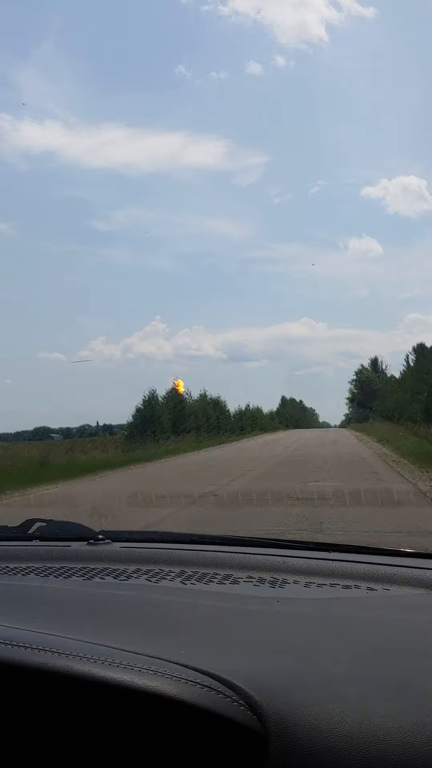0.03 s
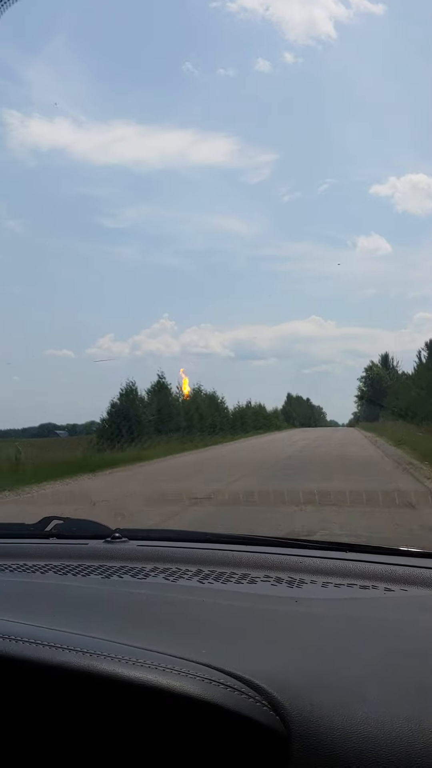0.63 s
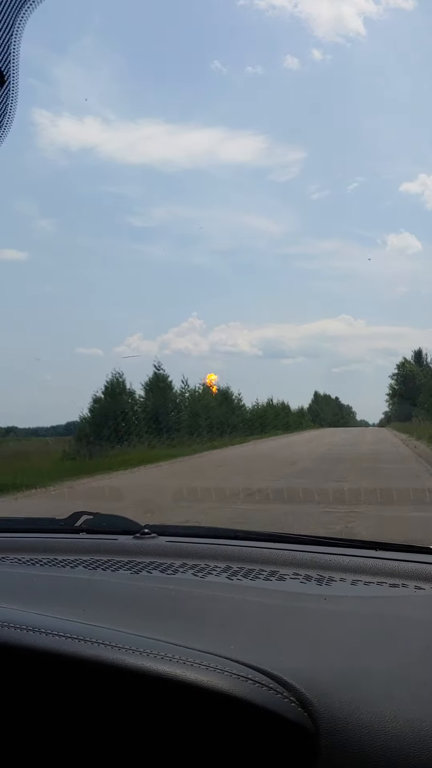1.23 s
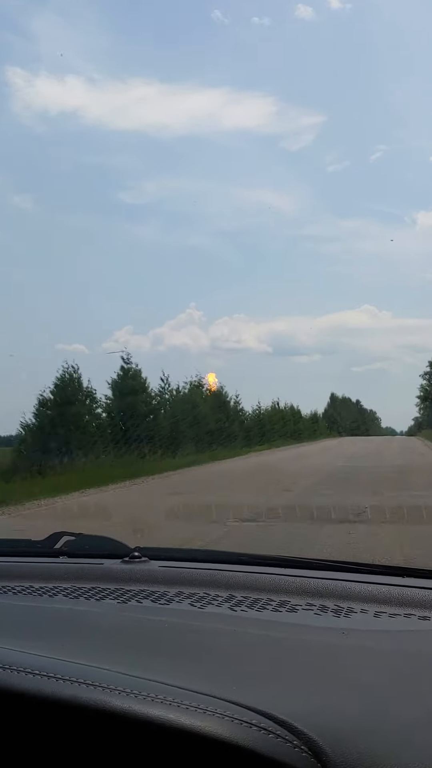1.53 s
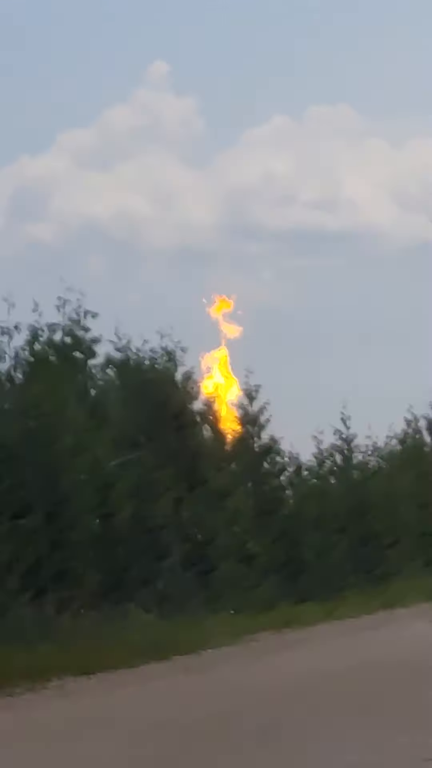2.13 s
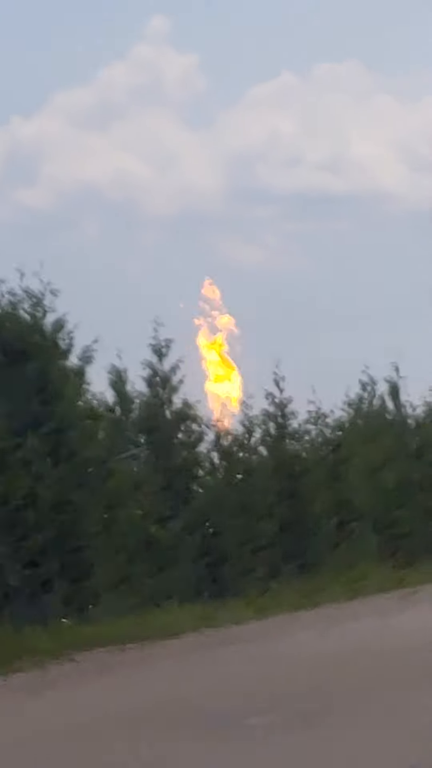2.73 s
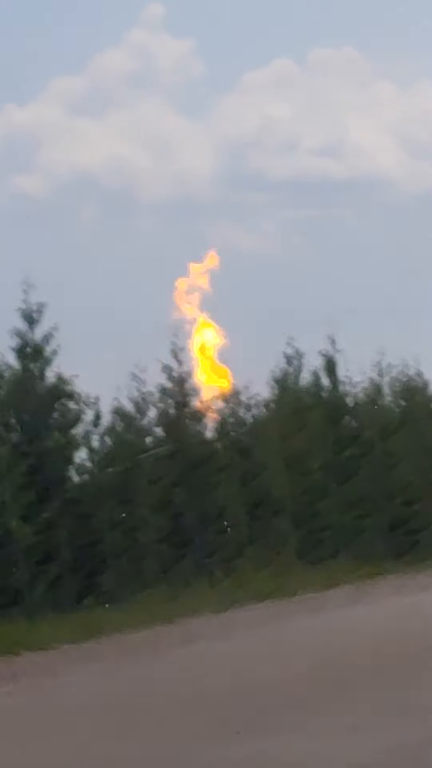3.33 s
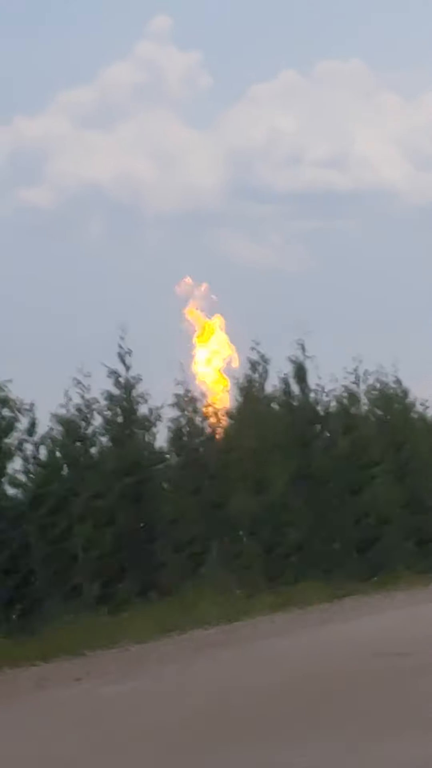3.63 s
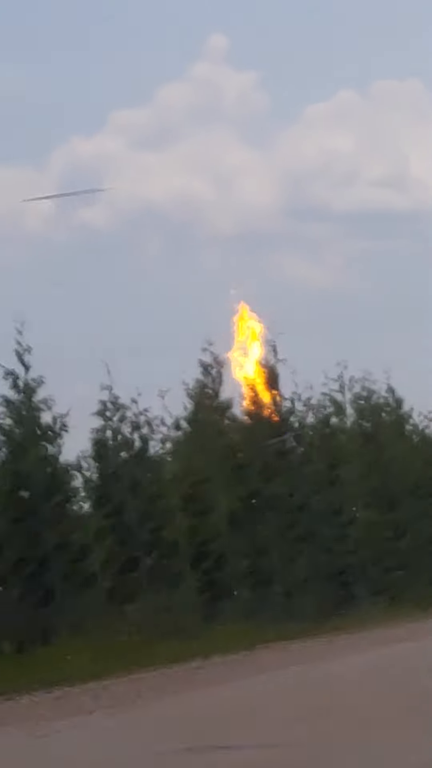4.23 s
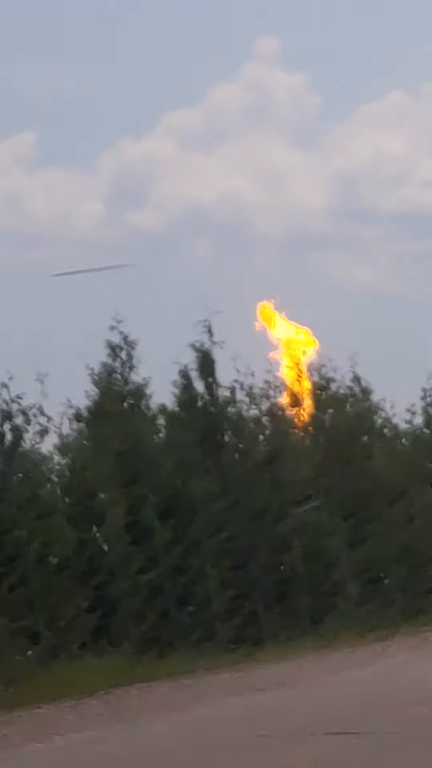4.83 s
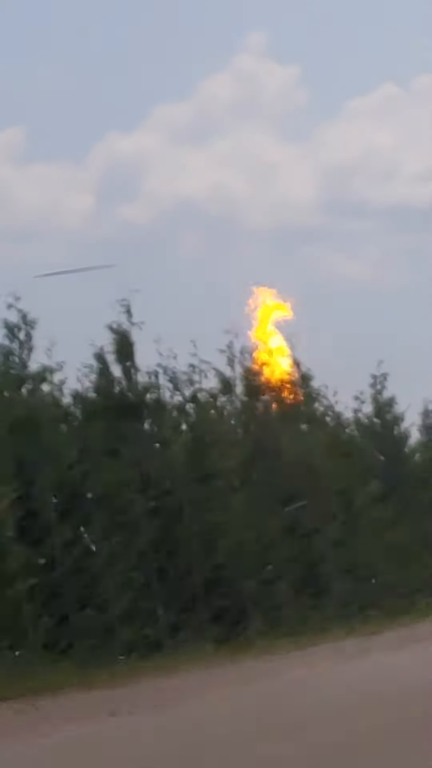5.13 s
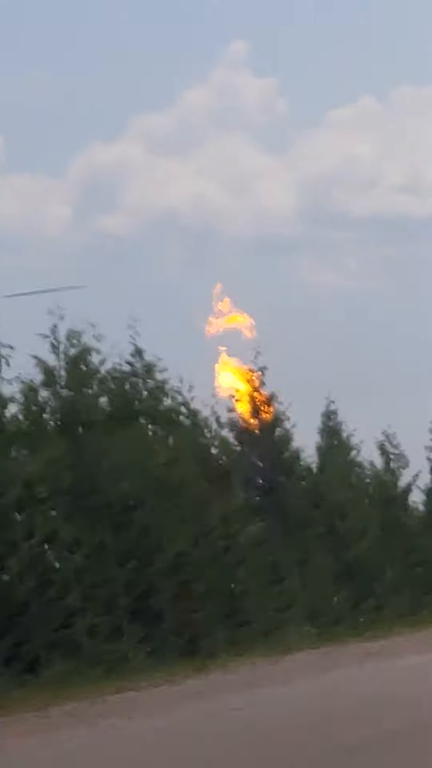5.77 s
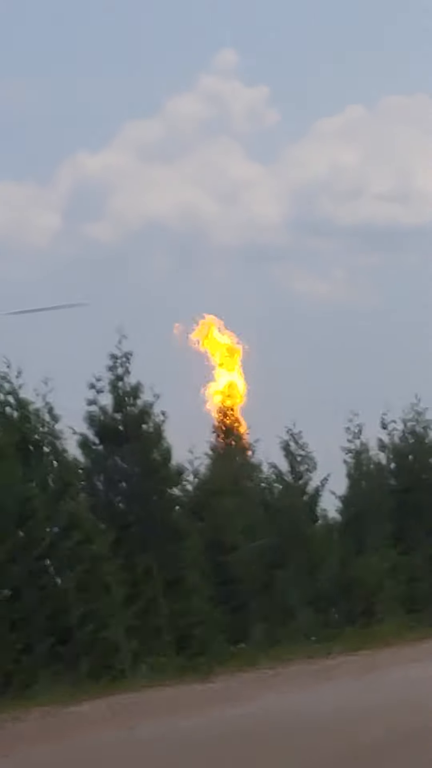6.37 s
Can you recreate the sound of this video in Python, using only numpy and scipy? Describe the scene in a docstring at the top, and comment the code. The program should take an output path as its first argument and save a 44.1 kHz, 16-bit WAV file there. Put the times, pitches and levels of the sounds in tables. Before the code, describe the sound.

Steady low rumble and tyre roar inside a moving car on a rough country road, with soft bumps and a faint wavering whistle.

```python
"""Inside a car on a country road, a stereo pair of microphones at the front seat: a steady, loud roar.
Bumps heave the body shell and the rough paving booms in the cabin. The tyres roar and rush, brighter
on the right as coarser ground rings the panels. A narrow whistle and its octave sing in the rush,
over faint air hiss and a few tiny trim ticks. The sound fades in after half a second of silence."""
import sys
import numpy as np
from scipy import signal
from scipy.fft import rfft, irfft, next_fast_len
from scipy.io import wavfile
from scipy.ndimage import uniform_filter1d, map_coordinates

SR = 44100
rng = np.random.default_rng(int(sys.argv[2]) if len(sys.argv) > 2 else 0)


def pcm_store(signal):
    """Save signal as 16-bit PCM."""
    levels = np.round(np.clip(np.atleast_2d(signal), -1, 1) * 32767)
    wavfile.write(sys.argv[1], SR, levels.astype(np.int16).T)


N = 282240
START_S = 0.5233  # silence until here

# Levels in the tables are relative: each layer adds its own gain.
# How alike the two microphones hear the cabin. Each row: frequency in Hz, coherence from 0 to 1.
MIC_COHERENCE = [(200, 0.99), (400, 0.87), (600, 0.6), (950, .7), (1300, 0.32), (1430, 0.69), (1700, 0.19),
                 (2100, 0.16), (2550, 0.84), (2800, 0.25), (7000, 0.32), (10000, .9)]
# Phase between the microphones. Each row: frequency in Hz, lead of the left in radians.
MIC_LEAD = [(250, 0), (950, 0.4), (1120, 0.5), (1300, -1), (1470, 0.5), (1650, 0.5), (2550, 2.5),
            (3200, 0.35), (3800, 2), (5000, 1.5), (8000, 1.5)]

# Noise colours at the front seat. Each row: frequency in Hz, left level in dB, right level in dB.
AIR_SPECTRUM = [(3000, -28.5, -27), (4840, 2, -1.5), (5900, -1.5, -4.5), (6500, -8, -1.5),
                (7000, -6.5, 3.5), (7800, -19.5, -11), (8500, -22.5, -24), (9900, -11.5, -20),
                (10500, -19, -22), (11600, -11, -17.5), (13000, -39.5, -30)]
HISS_SPECTRUM = [(2040, -60.5, -60), (2420, -3.5, -1.5), (2670, -7.5, -1), (2900, -4, -3.5), (3040, -5, -8),
                 (3220, -9, -4), (3375, -17, -3.5), (3760, -9.5, -11), (4660, -24.5, -17),
                 (5060, -22.5, -29), (6170, -37, -41), (8300, -65, -66.5), (12000, -100, -100)]
SINGING_SPECTRUM = [(1660, -39, -35), (1860, -16, -4), (2056, -12, 3.5), (2260, -17.5, -2),
                    (2310, -15, -4.5), (2550, -11.5, -21.5), (2620, -46, -43)]
RUSH_SPECTRUM = [(1200, -46.5, -49.5), (1265, -24, -19), (1416, -9, -1.5), (1470, -15.5, -1.5),
                 (1710, -17.5, -3.5), (1907, -14, 0.5), (2100, -19, -11.5), (2500, -13, -16),
                 (2900, -59, -59)]
ROAR_SPECTRUM = [(200, -59.5, -60.5), (288.4, -9, -1), (358.5, 0.5, -3.5), (428, -3.5, -11.5),
                 (452.5, -2.5, 0.5), (551, -9.5, -14), (720, -7, -9.5), (920, -6.5, -5), (1025, -6, -9),
                 (1127, -5, 0.5), (1220, -9, -12), (1400, -14.5, -15), (1690, -67, -56)]
SHELL_SPECTRUM = [(5, -59.5, -60), (12, -23, -17), (25, -6, -6), (33, -1, -5.5), (50.6, 0.5, 0.5),
                  (74.4, -11, -13.5), (113, -47, -49)]
THUMP_SPECTRUM = [(70.4, -17.5, -20.5), (94, -4, -3), (130, 0, -1), (162, -6, -6.5), (192, -25, -25.5)]
BOOM_SPECTRUM = [(50, -39, -40.5), (70, -10.5, -10.5), (82, 0.5, -1.5), (122, 1, -0.5), (170, -4.5, -6),
                 (198, -7.5, -5), (222.5, -9, -14), (269.3, -19, -16), (380, -50.5, -52.5)]
# Narrow resonances. Each row: centre in Hz, width in Hz, level in dB.
WHISTLE_MODES = [(1173, 12, 0), (1160, 18, -1), (1124, 18, -5)]
PANEL_MODES = [(1432, 40, -.5), (1535, 28, -1), (1670, 50, -2), (1976, 22, -4), (2125, 30, -4),
               (2620, 90, -11), (3516, 55, -18), (4441, 45, -25.5)]
CAVITY_MODES = [(235.5, 10, 0.49), (192, 17, -1.4)]

# Loose trim. Each row: start in seconds, body level in dB, body t60 in seconds, snap level in dB.
TRIM_TICKS = [(2.852, -60, .2, -75), (4.319, -59, .09, -53), (4.997, -51, .02, -61), (5.009, -42, .02, -54),
              (5.386, -48, .009, -46), (5.832, -54, .02, -64)]
# Colours of a tick's plastic body and of its snap. Each row: frequency in Hz, gain in dB.
TICK_BODY_SPECTRUM = [(2500, -20), (5400, 7), (7400, 2), (8800, -20), (11500, -23), (12700, -16),
                      (13600, -36)]
TICK_SNAP_SPECTRUM = [(2500, -15), (6500, 0), (9500, -7), (14700, -5), (15500, -20)]
# The whistle's swells. Each row: time in seconds, tone level in dB, noise skirt level in dB.
WHISTLE_LEVELS = [(.8, -48, -46), (1.25, -43, -49), (1.6, -47, -46), (2.8, -39.5, -41), (3.15, -45.5, -46),
                  (3.6, -34.5, -39.5), (4.15, -39, -39.5), (4.62, -33, -34), (4.85, -41, -37.5),
                  (5.2, -34.5, -35), (5.35, -36, -38), (5.48, -32.5, -37), (5.67, -31, -40),
                  (5.8, -38, -41), (5.97, -35.5, -35), (6.2, -44, -41), (6.35, -38, -38)]
# The whistle's drift. Each row: time in seconds, pitch in Hz.
WHISTLE_DRIFT = [(2.4, 1167), (3.6, 1179), (4.35, 1172), (4.65, 1153), (5.0, 1168), (5.6, 1171)]
# The swells of its octave. Each row: time in seconds, level in dB.
OCTAVE_LEVELS = [(1.0, -50), (1.9, -48), (2.8, -57.5), (3.6, -49.5), (4.4, -50.5), (4.8, -41.5),
                 (5.3, -45.5), (6.3, -45.5)]
# Notes the tread sings. Each row: peak time in seconds, half length in seconds, pitch in Hz, level in dB.
SUNG_NOTES = [(1.7, .4, 2035, -45), (2.22, .11, 2025, -35), (4.45, .08, 1990, -35.5),
              (4.46, .07, 3530, -46), (4.56, .06, 1440, -33), (4.97, .17, 2110, -32.5),
              (4.98, .1, 1550, -34), (5.0, .12, 2670, -41), (5.25, .09, 1985, -40), (5.85, .08, 2085, -39)]
# Tyres on changing paving. Each row: time in seconds, then roar, rush, singing and hiss levels in dB.
TREAD_LEVELS = [(.55, -35, -40.5, -40, -46.5), (1.0, -34.5, -38.5, -37, -44), (1.8, -32, -37, -38, -45),
                (2.08, -30.5, -37, -39.5, -44), (2.3, -31.5, -38, -36, -42.5),
                (2.58, -30.5, -37, -42.5, -46), (2.8, -32, -35.5, -42.5, -45),
                (3.3, -32, -35.5, -42, -42.5), (3.75, -31.5, -34, -40, -42.5), (4.25, -31.5, -36, -37, -40),
                (4.58, -29, -31.5, -36.5, -40), (4.8, -29.5, -31, -33.5, -38.5),
                (5.02, -30, -30.5, -34.5, -37.3), (5.35, -30.5, -33.5, -34.5, -37.5),
                (5.85, -31.5, -33, -37.5, -37.8), (6.2, -32.5, -34.5, -40, -39)]
# The largest bumps in the road. Each row: peak time in seconds, heave level in dB, thump level in dB.
ROAD_BUMPS = [(0.94, -17.5, -22.5), (1.02, -18.5, -31), (1.35, -17, -21.5), (1.531, -21.5, -19.5),
              (2.139, -16.5, -26), (2.309, -12.5, -31), (2.67, -17.5, -20.5), (2.88, -15, -19.5),
              (3.17, -14, -20.5), (3.41, -17, -16), (3.52, -16, -30), (3.85, -17, -20),
              (3.96, -14.5, -25.5), (4.09, -14, -22), (4.32, -12.5, -18.5), (4.51, -14, -24),
              (4.82, -15, -28.5), (5.04, -15.5, -21), (5.51, -14.5, -24), (5.67, -19.5, -23.5),
              (5.88, -15, -21)]
# How strongly the air rings inside the tyres. Each row: time in seconds, level in dB.
CAVITY_LEVELS = [(.6, -36), (1.5, -34), (2.4, -34.5), (3.4, -32), (4.0, -29), (4.6, -31), (5.3, -31.5),
                 (6.3, -32)]


def amp(db):
    """Gain of a level in dB."""
    return 10 ** (np.asarray(db) / 20)


def unit(x):
    """x at rms 1."""
    return x / np.sqrt(np.mean(x ** 2) + 1e-20)


def seconds():
    """The time of each sample."""
    return np.arange(N) / SR


def step(at_s, length_s):
    """A smooth rise from 0 to 1 around at_s."""
    return .5 + .5 * np.tanh((seconds() - at_s) / length_s)


def swell(at_s, half_s):
    """A bell-shaped rise to 1 and back around at_s."""
    return np.exp(-((seconds() - at_s) / half_s) ** 2)


def wobble(rate):
    """A smooth random curve, rate knots a second."""
    knots = rng.standard_normal(int(N * rate / SR) + 4)
    return map_coordinates(knots, [seconds() * rate])


def curves(rows):
    """One value per sample for each column after the time."""
    times, *columns = np.transpose(rows)
    return [np.interp(seconds(), times, column) for column in columns]


def along(rows, hz):
    """Each column after the frequency, read at hz on a log axis."""
    row_hz, *columns = np.transpose(rows)
    return np.array([np.interp(np.log(hz + 1), np.log(row_hz + 1), column) for column in columns])


def filtered(x, response):
    """x shaped by a gain that depends on frequency."""
    size = next_fast_len(N + SR // 2)
    hz = np.fft.rfftfreq(size, 1 / SR)
    return irfft(rfft(x, size) * response(hz), size)[..., :N]


def evened(x, samples):
    """Stereo x with its rms held near 1 over runs of this many samples."""
    power = uniform_filter1d(np.mean(x ** 2, axis=0), samples)
    return x / np.sqrt(np.abs(power) + 1e-9)


def patchy(x, depth_db):
    """Narrow bands of x swell and fade at random, as the surface under the tyres changes."""
    bands = signal.stft(x, nperseg=2048)[2]
    patches = rng.standard_normal(bands.shape)
    for size, axis in ((4, 1), (3, 1), (14, 2), (8, 2)):  # smooth over frequency, then time
        patches = uniform_filter1d(patches, size, axis)
    return signal.istft(bands * amp(depth_db * unit(patches)), nperseg=2048)[1][:, :N]


def cabin_noise(response):
    """Coloured noise at the microphones, mid at rms 1: one wave in the bass, more diffuse higher up."""
    hz = np.fft.rfftfreq(N, 1 / SR)
    spread = np.arccos(np.clip(along(MIC_COHERENCE, hz)[0], 0, 1)) / 2
    common, apart = rfft(rng.standard_normal((2, N))) * [np.cos(spread), np.sin(spread)]
    lead = np.exp(.5j * along(MIC_LEAD, hz)[0])
    left, right = (common + apart) * lead, (common - apart) / lead
    pair = irfft(np.array([left, right]) * response(hz), N)
    return pair / np.std(pair.mean(axis=0))


def broad(spectrum):
    """Noise with a broad left and right spectrum, silent beyond its ends."""
    low_hz, high_hz = spectrum[0][0], spectrum[-1][0]
    return cabin_noise(lambda hz: amp(along(spectrum, hz)) * (hz > low_hz) * (hz < high_hz))


def ringing(modes, right_db):
    """Narrow resonances kept ringing by noise, louder at the right microphone by right_db."""
    def response(hz):
        power = 0
        for centre, width, db in modes:
            peak = amp(db) / (1 + 2j * (hz - centre) / width)
            taper = np.exp(-(10 * np.log(hz / centre + 1e-9)) ** 2)
            power += np.abs(peak * taper) ** 2
        return np.sqrt(power)
    return cabin_noise(response) * amp([[-right_db / 2], [right_db / 2]])


def air_hiss():
    """Far in the background, the thin hiss of moving air dies down a little."""
    level_db = -64.5 - 6 * step(at_s=2.46, length_s=.35) + .8 * wobble(13)
    return amp(level_db) * broad(AIR_SPECTRUM)


def trim_ticks():
    """Loose trim ticks and rustles in the cabin: a small plastic body, a bright snap on hard contacts."""
    t = seconds()

    def decay(start, t60):
        return amp(-60 * np.abs(t - start) / t60) * (t >= start)
    body_level = sum(amp(db) * decay(start, t60) for start, db, t60, _ in TRIM_TICKS)
    snap_level = sum(amp(db) * decay(start, t60=.004) for start, _, _, db in TRIM_TICKS)
    body = filtered(body_level * rng.standard_normal(N), lambda hz: amp(along(TICK_BODY_SPECTRUM, hz)))
    snap = filtered(snap_level * rng.standard_normal(N), lambda hz: amp(along(TICK_SNAP_SPECTRUM, hz)))
    return body + snap


def whistle():
    """To the right, a wavering whistle and its octave swell and ebb, each in a skirt of narrow noise."""
    tone_db, skirt_db = curves(WHISTLE_LEVELS)
    pitch_hz, = curves(WHISTLE_DRIFT)
    octave_db, = curves(OCTAVE_LEVELS)
    phase = 2 * np.pi * np.cumsum(pitch_hz + 2.5 * wobble(35)) / SR
    phase = phase + [[1], [0]]  # the left microphone leads by a radian
    tone = amp(tone_db + 1.1 * wobble(14)) * unit(np.sin(phase))
    octave = amp(octave_db + 3.3 * wobble(26)) * np.sin(2 * phase)
    skirt = amp(skirt_db) * evened(ringing(WHISTLE_MODES, right_db=6), samples=5000)
    octave_skirt = amp(octave_db - 1.5) * ringing([(2335, 26, 0)], right_db=6)
    return (tone + octave) * amp([[-3], [3]]) + skirt + octave_skirt


def tread_notes(width_hz=24):
    """On some stretches of paving the tread's singing gathers into one brief note, off to the right."""
    notes = 0
    for at_s, half_s, hz, db in SUNG_NOTES:
        note = evened(ringing([(hz, width_hz, 0)], right_db=9.5), samples=4000)
        notes += amp(db) * swell(at_s, half_s) * note
    return notes


def tyres():
    """Tread on rough paving, heard from inside: the rush rings the panels, and all bands jolt together."""
    roar_db, rush_db, singing_db, hiss_db = curves(TREAD_LEVELS)
    jolts_db = .39 * wobble(14) + .5 * wobble(70)
    roar = amp(roar_db) * patchy(broad(ROAR_SPECTRUM), depth_db=1)
    rush = amp(rush_db - 4.5) * broad(RUSH_SPECTRUM)
    panel_db = rush_db - 5.5 + .6 * (rush_db - rush_db.max())  # strongest on the coarsest ground
    panels = amp(panel_db) * patchy(ringing(PANEL_MODES, right_db=11.5), depth_db=2)
    singing = amp(singing_db - 5) * broad(SINGING_SPECTRUM)
    hiss = amp(hiss_db - 4 + .67 * wobble(25)) * broad(HISS_SPECTRUM)
    return amp(jolts_db) * (roar + panels + patchy(rush + singing + hiss, depth_db=2.2))


def road_bumps(half_s=.05):
    """Bumps heave the body shell around the microphones and thump in the cabin."""
    unevenness = amp(-21 + 1.9 * wobble(13))  # the ordinary road between the bumps
    heave_level = sum(amp(db) * swell(at_s, half_s) for at_s, db, _ in ROAD_BUMPS)
    thump_level = sum(amp(db) * swell(at_s, half_s) for at_s, _, db in ROAD_BUMPS)
    thumps = thump_level * evened(broad(THUMP_SPECTRUM), samples=3500)
    heave = np.maximum(unevenness, heave_level) * evened(broad(SHELL_SPECTRUM), samples=4500)
    entry = amp(-22 * (1 - step(at_s=.793, length_s=.011)))  # the deepest bass comes in late
    return entry * heave + thumps


def cabin_boom(build_db=4.5, cruise_s=1.85):
    """Road texture rings the air inside the tyres and booms in the cabin, building until the car cruises."""
    rush_db = curves(TREAD_LEVELS)[1]
    below_cruise_db = build_db * np.clip((cruise_s - seconds()) / (cruise_s - START_S), 0, 1)
    paving_db = .29 * (rush_db - rush_db.mean())  # the boom gently follows the rush
    boom_db = -21 - below_cruise_db + paving_db + .32 * wobble(16)
    boom = amp(boom_db) * evened(broad(BOOM_SPECTRUM), samples=7000)
    cavity_db, = curves(CAVITY_LEVELS)
    cavity = amp(cavity_db) * evened(ringing(CAVITY_MODES, right_db=-1.5), samples=12000)
    entry = amp(-5 * (1 - step(at_s=.64, length_s=.01)))  # both step up during the fade-in
    return entry * (boom + cavity)


def scene():
    """Everything that reaches the front seat."""
    return road_bumps() + cabin_boom() + tyres() + tread_notes() + whistle() + air_hiss() + trim_ticks()


def record(dry):
    """The microphones open after a moment, fade in and keep nothing above their band limit."""
    opening_s, fade_db, fade_tau_s, top_hz = .0021, 16.5, .16, 15500
    open_for_s = np.maximum(seconds() - START_S, 0)
    opening = np.minimum(open_for_s / opening_s, 1)
    fade_in = amp(-fade_db * np.exp(-open_for_s / fade_tau_s))
    return filtered(dry * opening * fade_in, lambda hz: hz < top_hz)


dry = scene()
out = record(dry)
pcm_store(out)
```